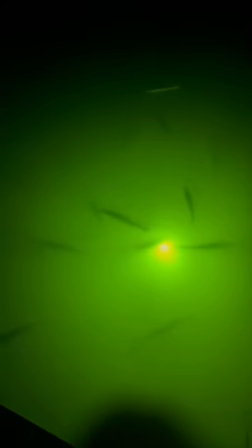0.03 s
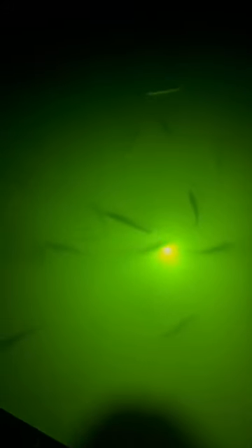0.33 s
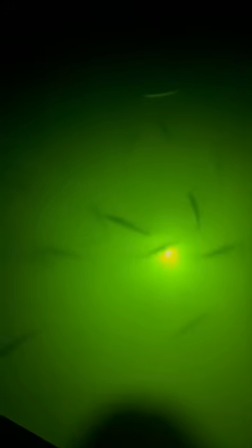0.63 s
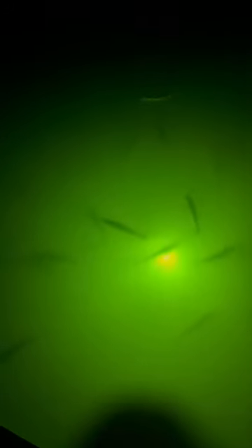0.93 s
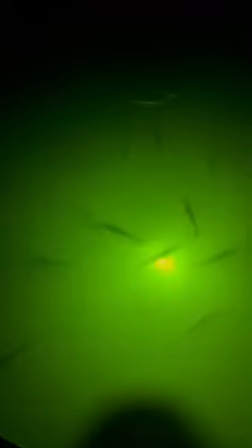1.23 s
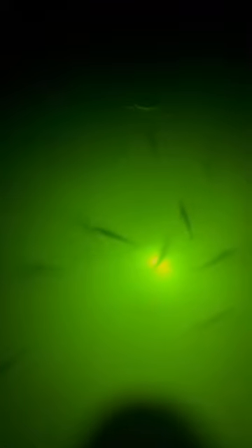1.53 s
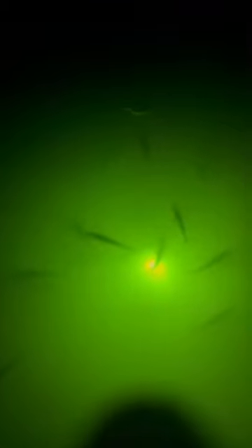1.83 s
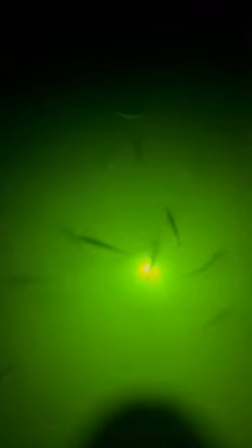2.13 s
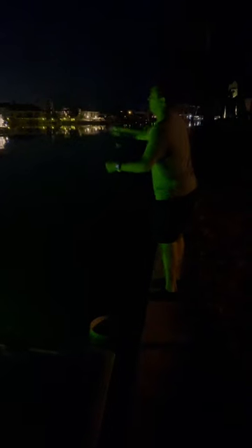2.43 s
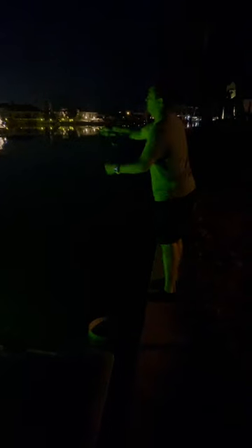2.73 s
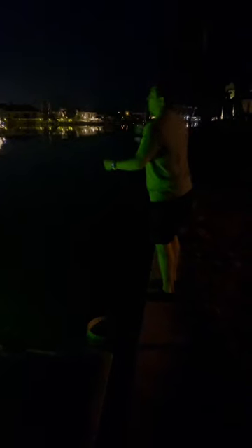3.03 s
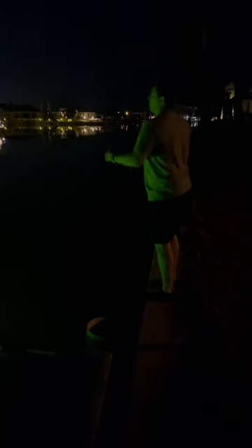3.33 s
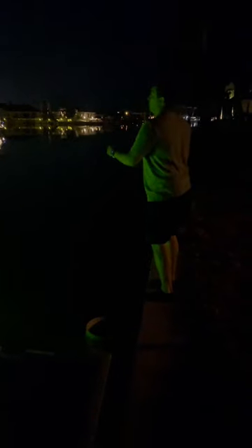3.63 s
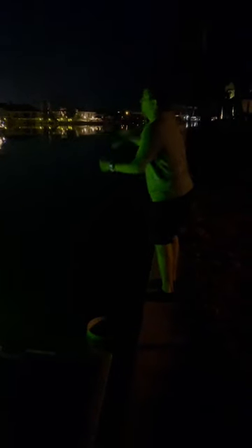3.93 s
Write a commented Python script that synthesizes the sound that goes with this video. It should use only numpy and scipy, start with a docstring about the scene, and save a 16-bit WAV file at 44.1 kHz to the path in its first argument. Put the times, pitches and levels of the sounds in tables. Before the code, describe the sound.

Fishing line hisses and zips faintly through rod rings over a distant town hum.

```python
"""The low hum of a town carries across a lake at night; water laps faintly. The scene changes after two
seconds. An angler swings a rod close by: the line hisses and rasps through the rod rings, with short zips that
fall in pitch as it slows. The tackle ticks now and then, and an insect chirps faintly."""
import sys
import numpy as np
from scipy import signal
from scipy.fft import rfft, irfft
from scipy.io import wavfile
from scipy.ndimage import uniform_filter1d

SR = 44100
rng = np.random.default_rng(int(sys.argv[2]) if len(sys.argv) > 2 else 0)


def pcm_store(signal):
    """Save signal as 16-bit PCM."""
    levels = np.round(np.clip(np.atleast_2d(signal), -1, 1) * 32767)
    wavfile.write(sys.argv[1], SR, levels.astype(np.int16).T)


N = 176400
T_S = np.arange(N) / SR
F_HZ = np.fft.rfftfreq(N, 1 / SR)


def amp(db):
    """dB to gain."""
    return 10 ** (np.asarray(db) / 20)


def unit(x):
    """Scale to rms 1."""
    return x / np.sqrt(np.mean(x ** 2) + 1e-30)


def per_bin(curve):
    """Curve at each FFT bin, interpolated in log frequency."""
    hz, value = np.transpose(curve)
    return np.interp(np.log(F_HZ + 1), np.log(hz + 1), value)


def colour(x, spectrum_db):
    """Spectral shaping, rms 1."""
    return unit(irfft(rfft(x) * amp(per_bin(spectrum_db)), N))


def wander(rate_hz):
    """Smooth random motion, rms 1."""
    return unit(irfft(rfft(rng.standard_normal(N)) * np.exp(-(F_HZ / rate_hz) ** 2), N))


def add(mix, start_s, sound):
    """Mix in at start_s."""
    part = mix[max(round(start_s * SR), 0):][:len(sound)]
    part += sound[:len(part)]


def whistle(pitch_hz, width_hz):
    """Noise in a steep resonance that follows a pitch curve."""
    pole = np.exp(-np.pi * width_hz / SR)
    noise = rng.standard_normal(N // 8) + 1j * rng.standard_normal(N // 8)
    for _ in range(3):
        noise = signal.lfilter([1 - pole], [1, -pole], noise)
    carrier = np.exp(2j * np.pi * np.cumsum(pitch_hz) / SR)
    return unit((noise[-len(pitch_hz):] * carrier).real)


def puffs(rows):
    """Rounded noise bursts, one pitch each."""
    out = np.zeros(N)
    for start_s, length_s, hz, width_hz, db in rows:
        arch = np.sin(np.linspace(0, np.pi, int(length_s * SR)))
        add(out, start_s, amp(db) * arch * whistle(np.full(len(arch), hz), width_hz))
    return out


# Hum spectra, before and after the scene change: f/Hz, relative level/dB
HUM_EARLY_DB = [(20, -28), (31, -27.5), (41, -3.5), (62, -2), (120, -3), (145, -6), (200, -12.5),
                (320, -20.5), (500, -25.5), (700, -22), (950, -25), (1320, -34.5), (2130, -42), (2700, -50),
                (3300, -53.5), (5000, -58.5), (7200, -57), (9500, -74), (11000, -55), (12500, -71.5),
                (14000, -75)]
HUM_LATE_DB = [(20, -23), (31, -18), (42, -8.5), (85, 2.5), (120, -4), (150, -8.5), (220, -17), (350, -20),
               (600, -18.5), (950, -21), (1300, -30.5), (1800, -37.5), (2400, -44.5), (4000, -50),
               (11000, -76), (12800, -74), (14500, -88)]
# Hum stereo image: f/Hz, left-right coherence
HUM_COHERENCE = [(60, 0.99), (130, 1), (270, 0.89), (580, 0.5), (1250, 0.42), (2700, 0.17), (11000, 0.018)]
# Wash swell: t/s, gain/dB
SWELL_DB = [(0, -0.78), (1.2, -0.63), (1.7, 1), (2.5, -0.23), (3.3, 0.83), (4, -0.39)]
# Drones: f/Hz, early level/dB, late level/dB
DRONES = [(61.25, -58, -67.5), (80.35, -58, -59.5), (118.6, -58, -62.5), (186.1, -62.5, -73.5)]

def town(change_s=2.25, fade_s=0.21, wash_hz=736, flutter_db=0.96, lean_right_db=0.63):
    """Distant hum and wash, mono in the bass and wide above, with wavering drones."""
    coherence = np.clip(per_bin(HUM_COHERENCE), -1, 1)
    late = np.clip((T_S - change_s) / fade_s + .5, 0, 1)
    out = np.zeros((2, N))
    for spectrum_db, db, share in ((HUM_EARLY_DB, -49, 1 - late), (HUM_LATE_DB, -50.5, late)):
        mid, side = rfft(rng.standard_normal((2, N))) * np.sqrt([1 + coherence, 1 - coherence])
        noise = irfft([mid + side, mid - side], N)
        out += amp(db) * np.sqrt(share) * colour(noise, spectrum_db)
    wash = irfft(rfft(out) * np.exp(-np.log2((F_HZ + 1) / wash_hz) ** 2 / 2), N)
    swell_db = np.interp(T_S, *np.transpose(SWELL_DB)) + flutter_db * wander(9.1)
    out += wash * (amp(swell_db) - 1)
    for hz, early_db, late_db in DRONES:
        pitch_hz = hz + 3 * wander(6)
        tone = np.sin(2 * np.pi * np.cumsum(pitch_hz) / SR) * (1 + .5 * wander(6.4))
        out += unit(tone) * amp(early_db + late * (late_db - early_db))
    return out * amp([[-lean_right_db / 2], [lean_right_db / 2]])


# Laps: t/s, length/s, f/Hz, width/Hz, level/dB
LAPS = [(1.04, 0.012, 790, 497, -60), (1.612, 0.0179, 695, 400, -56.5), (1.745, 0.042, 694, 500, -59.5),
        (1.9, 0.027, 545, 250, -60)]

def water():
    """Faint laps at the shore."""
    return puffs(LAPS)


# Chirps: centre t/s, f/Hz, level/dB
CHIRPS = [(.645, 4840, -87), (2.2, 4580, -76), (2.592, 4620, -69), (2.683, 4620, -69), (2.765, 4700, -79),
          (2.85, 4620, -75), (3.3, 4610, -71), (3.394, 4580, -70), (3.475, 4620, -73), (3.565, 4620, -75),
          (3.995, 4570, -69)]

def insect(chirp_s=.052, waver_hz=40, rise_hz_per_s=1200, left_lead_rad=2.2):
    """Wavering, slightly rising chirps from one side."""
    out, t = np.zeros((2, N)), T_S[:int(chirp_s * SR)]
    arch = np.sin(np.pi * t / chirp_s) ** 2
    for centre_s, hz, db in CHIRPS:
        pitch_hz = hz + rise_hz_per_s * (t - chirp_s / 2) + waver_hz * wander(250)[:len(t)]
        phase_rad = 2 * np.pi * np.cumsum(pitch_hz) / SR
        for channel, lag_rad in zip(out, (0, left_lead_rad)):
            add(channel, centre_s - chirp_s / 2, amp(db) * arch * unit(np.sin(phase_rad - lag_rad)))
    return out


# Swings: t/s, length/s, f/Hz, width/Hz, level/dB
SWINGS = [(2.3, .09, 396.4, 200, -59), (3.91, .12, 330.5, 198, -61.5)]

def rod():
    """Air pushed by the swinging rod."""
    return puffs(SWINGS)


# Left channel phase lead: f/Hz, left phase lead/rad
LEFT_LEAD_RAD = [(20, 0), (1900, 0), (3200, 1), (4100, .8), (4700, 3), (5700, 6.1), (6100, 6.35),
                 (8000, 8.55), (10000, 10.2), (11700, 11.9), (14000, 12.6)]

def from_angler(x):
    """Sound from the angler, the left channel leading by a phase that varies with frequency."""
    right = irfft(rfft(x) * np.exp(-1j * per_bin(LEFT_LEAD_RAD)), N)
    return np.array([x, right])


# Ticks: t/s, f/Hz, half width/Hz, peak level/dB
TICKS = [(.2337, 10800, 600, -57), (3.9138, 4900, 1050, -48), (3.9137, 10200, 800, -65)]

def tackle():
    """Small dry contacts, each over within a millisecond or two."""
    out, t = np.zeros(N), T_S[:SR // 100] - T_S[SR // 200]
    for centre_s, hz, half_width_hz, db in TICKS:
        envelope = np.exp(-(2 * np.pi * half_width_hz * t) ** 2 / 2)
        add(out, centre_s + t[0], amp(db) * envelope * np.cos(2 * np.pi * hz * t))
    return out


# Scuffs: t/s, length/s, f/Hz, width/Hz, level/dB
SCUFFS = [(1.51, .04, 3800, 3000, -86), (1.565, .035, 4000, 3000, -87), (2.398, .028, 2250, 1500, -64),
          (2.533, .012, 3000, 2400, -66.5), (2.555, .042, 2500, 1200, -64),
          (2.62, 0.029, 2700, 1800, -67.5), (2.725, 0.019, 2350, 1800, -63.5),
          (3.011, 0.0083, 6000, 9000, -66.5), (3.157, .014, 8870, 5000, -58),
          (3.19, 0.031, 1780, 800, -67.5), (3.43, 0.045, 2390, 1200, -73), (3.635, 0.029, 3470, 900, -82)]

def line_scuffs():
    """The line catches and rubs."""
    return puffs(SCUFFS)


# Zips: t/s, length/s, first f/Hz, last f/Hz, width/Hz, level/dB
ZIPS = [(2.21, 0.055, 11150, 9850, 600, -63.5), (2.356, 0.025, 11000, 10350, 1100, -62.5),
        (2.528, 0.083, 11200, 9750, 1500, -60), (2.578, 0.07, 8750, 5670, 1480, -62.5),
        (3.003, 0.052, 10300, 8100, 2200, -69), (3.116, 0.081, 12200, 9400, 2600, -70),
        (3.145, 0.067, 3970, 1650, 900, -75.5), (3.269, 0.061, 8800, 5270, 1100, -63),
        (3.513, 0.064, 6930, 6360, 2400, -72.5), (3.684, 0.027, 11000, 10440, 1000, -61)]

def line_zips(bend=2.1):
    """The running line falls in pitch as it slows."""
    out = np.zeros(N)
    for start_s, length_s, first_hz, last_hz, width_hz, db in ZIPS:
        progress = np.linspace(0, 1, int(length_s * SR))
        pitch_hz = first_hz + (last_hz - first_hz) * progress ** bend
        add(out, start_s, amp(db) * np.sin(np.pi * progress) * whistle(pitch_hz, width_hz))
    return out


def patchy(x, depth_db):
    """Brief random resonances come and go in the friction."""
    frames = signal.stft(x, nperseg=512)[2]
    patches = uniform_filter1d(rng.standard_normal(frames.shape), size=4, axis=0)
    patches = uniform_filter1d(patches, size=5, axis=1)
    return unit(signal.istft(frames * amp(depth_db * unit(patches)), nperseg=512)[1][:N])


def friction(spectrum_db, scatter, flicker_db, patchy_db, slips_per_s=1200, slip_share=0.1):
    """Dense tiny slips of line on the rings; part arrives scattered by the bank."""
    slips = (rng.random(N) < slips_per_s / SR) * rng.standard_normal(N)
    drive = np.sqrt(slip_share) * unit(slips) + np.sqrt(1 - slip_share) * rng.standard_normal(N)
    direct = from_angler(patchy(drive, patchy_db) * amp(flicker_db * wander(83)))
    return colour(direct + scatter * rng.standard_normal((2, N)), spectrum_db)


# Friction spectra: f/Hz, relative level/dB
HISS_DB = [(3000, -28), (4400, -14), (5200, -3), (6700, -1), (8500, 1), (10500, -3), (12500, -30)]
SIZZLE_DB = [(6000, -32), (8200, -15), (9900, -1.5), (10600, 2), (11250, -3.5), (11900, -13.5),
             (12500, -39), (13500, -53)]
RASP_DB = [(1000, 5.5), (1800, 1.5), (2650, 2.5), (3400, -3), (4200, 0), (5500, -4), (8000, -36)]
# Friction envelopes, before trim: t/s, hiss level/dB, sizzle level/dB, rasp level/dB
SLIDE_DB = [(2.17, -107, -105, -79), (2.19, -80, -79, -90), (2.226, -83.5, -78, -107),
            (2.286, -82.5, -77.5, -82.5), (2.404, -70, -66.5, -70.5), (2.48, -69, -63.5, -69.5),
            (2.51, -70, -49, -71), (2.576, -68.5, -58.5, -71.5), (2.612, -68.5, -71.5, -71),
            (2.75, -73, -73, -73), (2.852, -72, -77, -73), (2.914, -77, -83, -83), (2.96, -82.5, -87, -87),
            (3.005, -83, -89, -81), (3.04, -74, -74, -80), (3.09, -75.5, -79, -84), (3.115, -74, -65, -79),
            (3.155, -75, -65.5, -73.5), (3.204, -75.5, -81, -75), (3.27, -71.5, -72, -78.5),
            (3.316, -74, -82, -92), (3.336, -74.5, -84, -78.5), (3.474, -78.5, -81.5, -81.5),
            (3.536, -78.5, -77.5, -84.5), (3.648, -79.5, -74.5, -83), (3.708, -73.5, -71.5, -86),
            (3.82, -86, -82.5, -104), (3.892, -84, -93, -97), (3.912, -80, -81, -79),
            (3.928, -79.5, -100, -82), (4.0, -74, -76, -69.5)]

def sliding_line(onset_s=2.185, attack_s=.005):
    """Hiss, top sizzle and low rasp swell and fade as the line runs through the rings."""
    t, hiss_db, sizzle_db, rasp_db = np.transpose(SLIDE_DB)
    hiss = friction(HISS_DB, scatter=0.1, flicker_db=0.9, patchy_db=1.5)
    sizzle = friction(SIZZLE_DB, scatter=0.067, flicker_db=2.0, patchy_db=0.7)
    rasp = friction(RASP_DB, scatter=0.24, flicker_db=0.0, patchy_db=3.0)
    out = np.zeros((2, N))
    for layer, envelope_db, trim_db in ((hiss, hiss_db, 5), (sizzle, sizzle_db, 5), (rasp, rasp_db, 6)):
        out += layer * amp(trim_db + np.interp(T_S, t, envelope_db))
    return out * np.clip((T_S - onset_s) / attack_s, 0, 1)


def scene():
    """Shore and angler, stereo."""
    angler = sliding_line() + from_angler(line_zips() + tackle() + line_scuffs()) + rod()
    return town() + water() + insect() + angler


def record(dry):
    """Low-pass at 13.8 kHz."""
    taps = signal.firwin(255, 13800, window=("kaiser", 9), fs=SR)
    return signal.oaconvolve(dry, taps[None], "same")


dry = scene()
out = record(dry)
pcm_store(out)
```